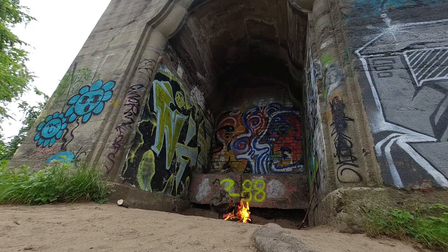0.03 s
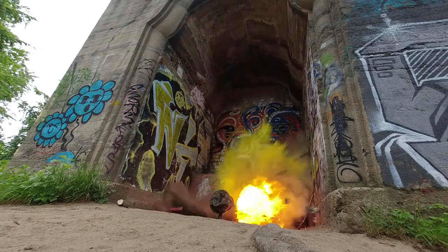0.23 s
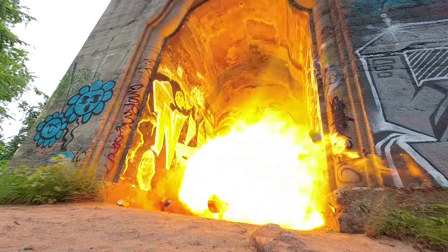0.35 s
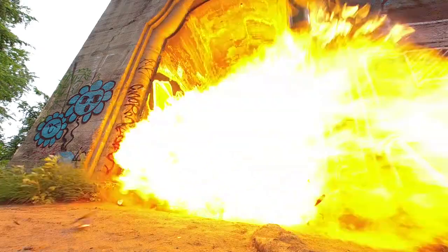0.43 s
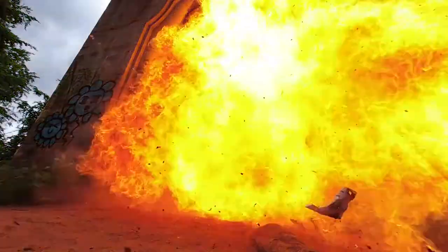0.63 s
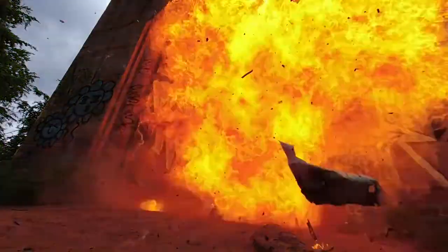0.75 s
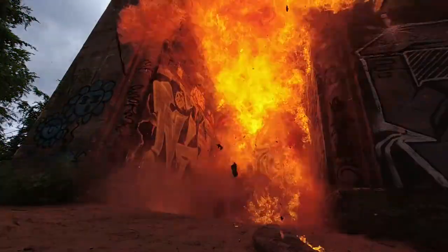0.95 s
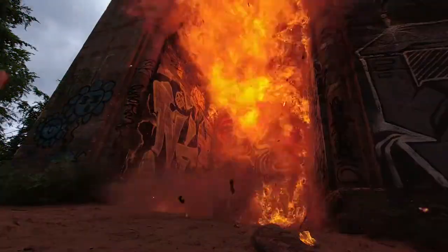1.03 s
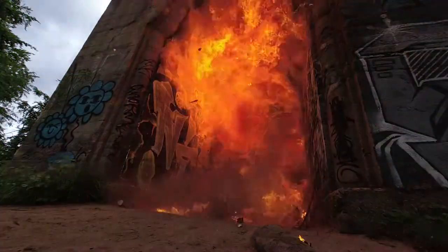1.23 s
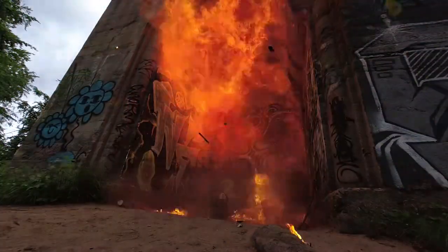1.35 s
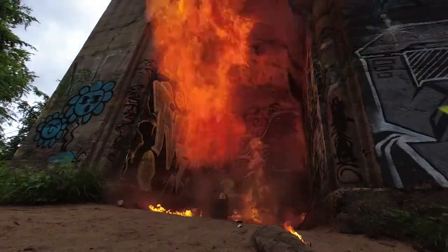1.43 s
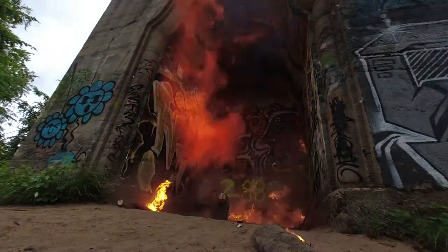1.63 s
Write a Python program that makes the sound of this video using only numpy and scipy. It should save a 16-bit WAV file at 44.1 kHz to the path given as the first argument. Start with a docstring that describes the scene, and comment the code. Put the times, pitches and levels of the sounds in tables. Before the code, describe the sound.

A gas cartridge explodes outdoors a few metres away. After a faint flutter of flame, a sharp crack at about 0.25 seconds opens into a hissing roar, ringing in a concrete niche. A deep boom peaks around 0.5 seconds, overloading the microphone, and fades by 0.9. Quiet fire rumbles on as grit ticks down and clods thump softly. At 1.5 seconds a piece of the can lands with a short clank.

```python
"""Outdoors, at a concrete niche a few metres away, a gas cartridge bursts in a small fire.
The crack of tearing metal sets the air in the niche ringing. The gas ignites with a roar that
echoes from a wall and trees, and its swell of pressure overloads the microphone.
The fire rumbles on while grit rains down, clods thump and a piece of the can hits the ground."""
import sys
import numpy as np
from scipy import signal
from scipy.fft import rfft, irfft
from scipy.io import wavfile
from scipy.ndimage import uniform_filter1d

SR = 44100
rng = np.random.default_rng(int(sys.argv[2]) if len(sys.argv) > 2 else 0)


def file_out(sig):
    """Save sig as 16-bit WAV at sys.argv[1]."""
    # one column per channel
    cols = np.atleast_2d(sig).T
    # limit, then scale
    lim = np.clip(cols, -1, 1)
    pcm = np.round(lim * 32767).astype(np.int16)
    wavfile.write(sys.argv[1], SR, pcm)


N = 74970
T = np.arange(N) / SR
BURST_S, IGNITION_S, IGNITION_RISE_S = 0.2345, 0.2398, 0.019
CUTOFF_HZ = 16000


def from_db(db):
    """Turn decibels into a gain."""
    return 10 ** (np.asarray(db) / 20)


def unit_power(x):
    """Scale a signal to an average power of 1."""
    return x / np.sqrt(np.mean(x ** 2) + 1e-20)


def level(points):
    """A gain that glides between (time, dB) points."""
    return from_db(np.interp(T, *np.transpose(points)))


def at_hz(points, hz):
    """Read between a table's rows, with octaves evenly spaced."""
    f, value = np.transpose(points)
    return np.interp(np.log(hz), np.log(f), value)


def envelope(start, rise, hold, fall_db_per_s):
    """Rise in a straight line, hold, then fade; times in seconds."""
    fading_s = np.maximum(T - start - rise - hold, 0)
    return np.clip((T - start) / rise, 0, 1) * from_db(-fall_db_per_s * fading_s)


def decay(start, rise, fade):
    """Rise, then die away. Here and in the tables, fade is the time to drop 60 dB."""
    return envelope(start, rise, 0, 60 / fade)


# How alike the two ears' signals are: f/Hz, likeness (1 same, -1 opposite)
EAR_LIKENESS = [(30, 0.99), (150, 0.98), (400, 0.97), (1000, 0.82), (2500, 0.25), (6000, -0.32),
                (12000, -0.063)]
def coloured(spectrum, source=None, width=1):
    """Give stereo noise (or a source pair) a tone colour, at power 1; width under 1 narrows it."""
    hz = np.maximum(np.arange(N // 2 + 1) * SR / N, 1)
    mid, side = rfft(rng.standard_normal((2, N)) if source is None else source)
    alike = np.clip(at_hz(EAR_LIKENESS, hz), -1, 1)
    stereo = np.sqrt(1 + alike) * mid + width * np.sqrt(1 - alike) * side * [[1], [-1]]
    gain = from_db(at_hz(spectrum, hz)) * (hz > 15) * (hz < CUTOFF_HZ)
    return unit_power(irfft(gain * stereo, N))


def flicker(rate_hz, depth_db):
    """A gain that wanders at random."""
    size = max(int(SR / rate_hz), 1)
    wander = uniform_filter1d(rng.standard_normal(N), size, mode="wrap")
    smooth = uniform_filter1d(wander, size, mode="wrap")
    return from_db(depth_db * unit_power(smooth))


def ring(drive, tones):
    """An object answers a push by ringing at its own tones."""
    out = 0
    for hz, db, fade in tones:
        shrink, turn = from_db(-60 / (fade * SR)), 2 * np.pi * hz / SR  # per sample
        feedback = [1, -2 * shrink * np.cos(turn), shrink * shrink]
        out = out + from_db(db) * signal.lfilter([0, np.sin(turn)], feedback, drive + 1e-18)
    return out


def low_swings(rows):
    """Slow swings of the air that die away."""
    return sum(from_db(db) * decay(start, rise, fade) * np.sin(2 * np.pi * hz * (T - start))
               for start, hz, db, rise, fade in rows)


# Loudness of the flames and of the draught: t/s, level/dB
FLAME_LOUDNESS = [(0, -56), (.23, -55), (.3, -44), (1.0, -41.5), (1.15, -41), (1.3, -42), (1.5, -40.5),
                  (1.6, -41), (1.7, -44.5)]
DRAUGHT_LOUDNESS = [(0, -57), (.2, -48), (.7, -51), (1.1, -38), (1.35, -63.5), (1.5, -40.5), (1.7, -39.5)]
# Their tone colours: f/Hz, level/dB
FLAME_COLOUR = [(25, -4), (60, 0), (150, 0.5), (300, -8), (650, -13), (1300, -27), (2600, -33.5),
                (5000, -40.5), (9000, -51), (16000, -41)]
DRAUGHT_COLOUR = [(20, 8), (42, 15.5), (70, 12), (150, -37.5), (600, -91)]
def fire():
    """Flames flutter over the low rumble of the draught that feeds them."""
    flutter = flicker(rate_hz=50, depth_db=1.0)
    flames = level(FLAME_LOUDNESS) * coloured(FLAME_COLOUR) * flutter
    return flames + level(DRAUGHT_LOUDNESS) * coloured(DRAUGHT_COLOUR)


def grains(per_s, spread_db):
    """Tiny hits of uneven size at random times."""
    sizes = from_db(spread_db * np.minimum(rng.exponential(1, (2, N)), 4))
    signs = rng.choice([-1, 1], (2, N))
    return sizes * signs * (rng.random((2, N)) < per_s / SR)


# Tone colours of fine grit and coarse rubble: f/Hz, level/dB
GRIT_COLOUR = [(1000, -27), (3000, -16), (6000, -9), (8500, 12), (10500, 4.5), (13500, 15), (16000, -1)]
RUBBLE_COLOUR = [(500, 0), (1300, 39), (2600, 10), (4500, -22), (9000, -53)]
def grit(start=0.56):
    """A shower of fine grit thins to a trickle, then coarser rubble crackles down."""
    shower = envelope(start, rise=0.16, hold=0.022, fall_db_per_s=44)
    trickle = from_db(-23.5) * (T > start)
    fine = np.maximum(shower, trickle) * coloured(GRIT_COLOUR, grains(per_s=11000, spread_db=6))
    rattle = envelope(start=0.86, rise=0.46, hold=0.19, fall_db_per_s=75)
    coarse = rattle * coloured(RUBBLE_COLOUR, grains(per_s=300, spread_db=3))
    return from_db(-53) * fine + from_db(-61.5) * coarse


# Chips landing: t/s, level/dB, f/Hz, snap compared with the peak/dB, fade/s
CHIP_HITS = [(.55, -37.5, 3780, -14, 0.025), (0.718, -40, 13000, -3, 0.032),
             (0.729, -37.5, 3560, -36, 0.022), (.738, -45.5, 3120, -29, 0.058),
             (0.835, -48.5, 7950, -56, 0.02), (0.8868, -38, 11800, -4.5, 0.016),
             (0.902, -41, 12200, -10, 0.027), (0.938, -43.5, 3820, -9, 0.0095),
             (0.979, -44, 10500, -8, 0.015), (1.0015, -50, 15000, -19, .025),
             (1.072, -41.5, 5300, -9, 0.014), (1.2525, -56, 2280, -43, .025), (1.36, -67, 2500, -52, 0.03),
             (1.43, -41, 3000, -20.5, 0.022), (1.431, -46.5, 5200, -42, 0.052),
             (1.512, -40, 2000, -2, 0.03), (1.575, -52.5, 2530, -10, 0.034), (1.605, -56, 3040, -12, 0.025)]
def chips(peak_ratio=2.04):
    """Each small chip ticks: a bright peak of noise over a broad snap."""
    out = 0
    for start, db, hz, snap_db, fade in CHIP_HITS:
        edge_db = snap_db - 6.5
        colour = [(hz / 8, edge_db), (hz / peak_ratio, snap_db), (hz, 0),
                  (hz * peak_ratio, snap_db), (hz * 4, edge_db)]
        out = out + from_db(db) * decay(start, 0.00022, fade) * coloured(colour)
    return out


# Clods landing: t/s, level/dB, rise/s, fade/s
CLOD_HITS = [(0.984, -40.5, 0.0039, 0.052), (1.091, -43.5, 0.0049, 0.14), (1.18, -46, 0.0064, 0.13),
             (1.407, -43, 0.0074, 0.32)]
# Their tone colour: f/Hz, level/dB
CLOD_COLOUR = [(200, -4), (600, 19), (1100, 8), (1600, -2), (3000, -3), (6000, -54), (8000, -37),
               (16000, -40)]
def clods():
    """Clods come down with soft, rough thumps."""
    thumps = sum(from_db(db) * decay(start, rise, fade) for start, db, rise, fade in CLOD_HITS)
    return thumps * coloured(CLOD_COLOUR) * flicker(rate_hz=680, depth_db=-2.5)


# The piece of can strikes twice: t/s, level/dB
CAN_HITS = [(1.4898, -20.5), (1.4925, -35.5)]
# Tone colour of its slap: f/Hz, level/dB
SLAP_COLOUR = [(150, -13), (400, 1.5), (1100, 0), (1700, -3), (3200, -10.5), (4500, -7), (7000, -18),
               (12000, -17.5), (16000, -24)]
# Its ringing tones: f/Hz, level compared with the first hit/dB, fade/s
CAN_TONES = [(620, -21, 0.29), (860, -23, 0.055), (986, -15, 0.23), (1109, -23, 0.16), (1246, -6, 0.03),
             (1480, -17, 0.074), (2320, -7.5, 0.02), (3250, -18, 0.024)]
# Heavier pieces landing: t/s, f/Hz, level/dB, rise/s, fade/s
HEAVY_THUDS = [(.988, 152.4, -33.5, 0.02, 0.12), (1.082, 113, -37, 0.0094, 0.078),
               (1.495, 85.4, -27.5, 0.0046, 0.2), (1.497, 188, -27.5, 0.0015, 0.055),
               (1.59, 86.7, -27, 0.014, 0.144)]
def landing():
    """A piece of the can slaps down edge first, rings briefly and echoes; heavier pieces thud."""
    slaps = 0
    for start, db in CAN_HITS:
        echo = from_db(-19) * decay(start, rise=0.011, fade=0.11)
        slaps = slaps + from_db(db) * (decay(start, rise=0.00076, fade=0.013) + echo)
    first_s, first_db = CAN_HITS[0]
    click = from_db(first_db) * (np.arange(N) == int(first_s * SR))
    return slaps * coloured(SLAP_COLOUR, width=0.83) + ring(click, CAN_TONES) + low_swings(HEAVY_THUDS)


# Strength of the fireball's push, before flattening: t/s, level/dB
PUSH_STRENGTH = [(.245, -27), (.275, -11), (.34, -12.5), (.42, -3), (.48, -.5), (.53, -4), (.62, -19),
                 (.68, -21.5), (.74, -31.5), (.9, -53), (1.1, -74)]
# Its tone colour: f/Hz, level/dB
PUSH_COLOUR = [(18, 8.5), (30, -4), (50, 1), (75, -8.5), (110, -6), (200, -21), (400, -94)]
# Booms of the niche and the slow backwash of air: t/s, f/Hz, level/dB, rise/s, fade/s
AIR_BOOMS = [(.292, 159.7, -3.5, 0.006, 0.29), (.455, 107.3, -3.5, 0.025, 0.078),
             (.5, 23.57, 6.5, 0.026, 0.24)]
def swell():
    """The fireball pushes the air; the microphone flattens the largest swings."""
    onset = np.clip((T - BURST_S) / IGNITION_RISE_S, 0, 1)
    push = onset * level(PUSH_STRENGTH) * coloured(PUSH_COLOUR)
    return np.tanh(push + low_swings(AIR_BOOMS))


# The niche's own tones: f/Hz, relative level/dB, fade/s
NICHE_TONES = [(338, -18, 0.12), (400, -39, 0.34), (524.6, -19, 0.47), (640.3, -8, .14), (820, -12.5, 0.16),
               (1065, -13, 0.093), (1320, -18, 0.083), (1510, -21, 0.24), (1724, -25.5, 0.25),
               (2019, -28.5, 0.13), (2420, -39.5, 0.099)]
def niche(push):
    """The air between the concrete walls rings when pushed."""
    return ring(push, NICHE_TONES)


# Tone colours of the burning gas, its hiss, its rush and its echo: f/Hz, level/dB
ROAR_COLOUR = [(100, -0.5), (200, 0), (330, -5.5), (620, -5), (1150, -15.5), (2500, -19.5), (5200, -21),
               (7500, -32.5), (10000, -33), (16000, -35)]
HISS_COLOUR = [(5000, -22), (7000, -9), (9000, -7), (10500, -9), (12000, -1), (13200, 0), (16000, -4)]
RUSH_COLOUR = [(350, -2), (630, -9), (1000, -6), (3000, -0.5)]
ECHO_COLOUR = [(50, -29), (150, -3), (350, -7.5), (700, -12), (1400, -23.5), (3000, -32), (5500, -37),
               (8000, -50), (16000, -70)]
def roar():
    """Gas ignites in ragged gusts with a hiss, rings the niche and echoes from the wall and trees."""
    flame = from_db(-12) * envelope(IGNITION_S, IGNITION_RISE_S, hold=0.055, fall_db_per_s=110)
    gusts = flicker(rate_hz=220, depth_db=-1.5)
    hiss = from_db(-29.5) * envelope(start=0.234, rise=0.014, hold=0.075, fall_db_per_s=135)
    rush = from_db(-26.5) * envelope(IGNITION_S, IGNITION_RISE_S, hold=0.011, fall_db_per_s=213)
    echo = from_db(-23) * envelope(BURST_S + 0.01, rise=0.13, hold=0, fall_db_per_s=41)
    return (hiss * coloured(HISS_COLOUR)
            + niche(rush * coloured(RUSH_COLOUR, width=0.78))
            + echo * coloured(ECHO_COLOUR)
            + flame * gusts * coloured(ROAR_COLOUR, width=0.59))


# Tone colour of tearing metal: f/Hz, level/dB
CRACK_COLOUR = [(100, -22), (400, -10), (780, 1), (1400, -14), (4000, -13), (7500, -29), (10500, -27),
                (13000, -18), (16000, -21)]
def burst(shock_s=0.002):
    """The metal tears with a crack; a shock, one push and one pull of air, rings the niche."""
    progress = (T - BURST_S) / shock_s
    shock = np.sin(2 * np.pi * progress) * ((progress >= 0) & (progress < 1))
    crack = from_db(-20.5) * decay(BURST_S, rise=0.0015, fade=0.09) * coloured(CRACK_COLOUR)
    return from_db(-6) * shock + crack + niche(shock / np.abs(shock).sum())


def scene():
    """Add it all up; burst, roar, fire and grit dip briefly near the height of the swell."""
    dip_s, dip_length_s, dip_db = 0.521, 0.025, -13.5
    dip = from_db(dip_db * np.exp(-(2 * (T - dip_s) / dip_length_s) ** 6))
    return swell() + dip * (burst() + roar() + fire() + grit()) + chips() + clods() + landing()


def record(dry, ceiling=0.92):
    """Round off the loudest peaks and cut the highest treble."""
    rounded = dry / (1 + (dry / ceiling) ** 4) ** .25
    treble_cut = signal.cheby2(14, 70, CUTOFF_HZ + 700, fs=SR, output="sos")
    return signal.sosfilt(treble_cut, rounded)


dry = scene()
out = record(dry)
file_out(out)
```